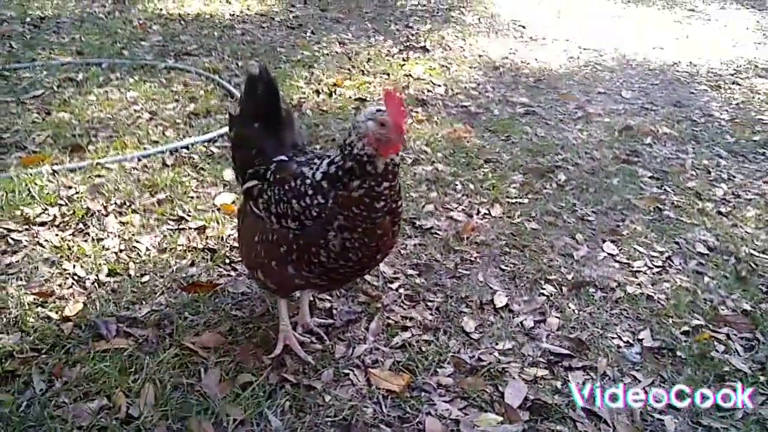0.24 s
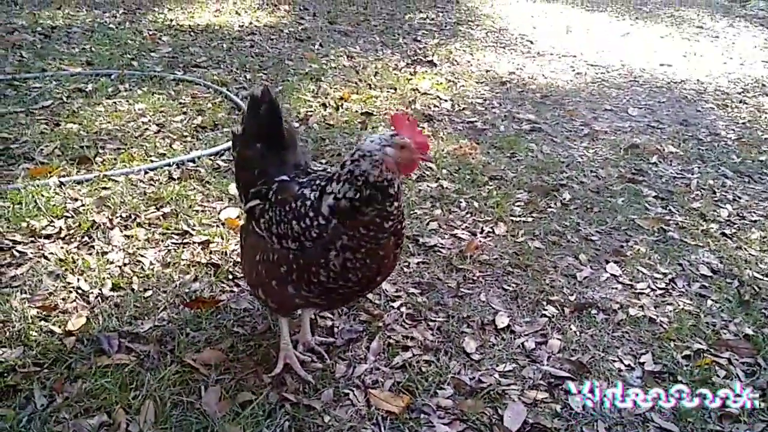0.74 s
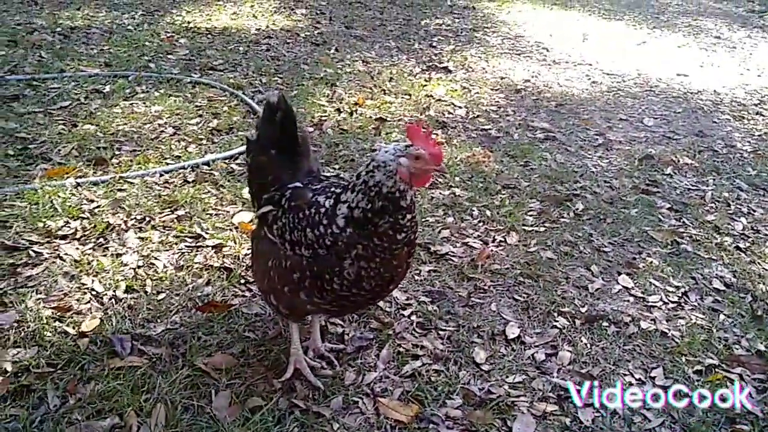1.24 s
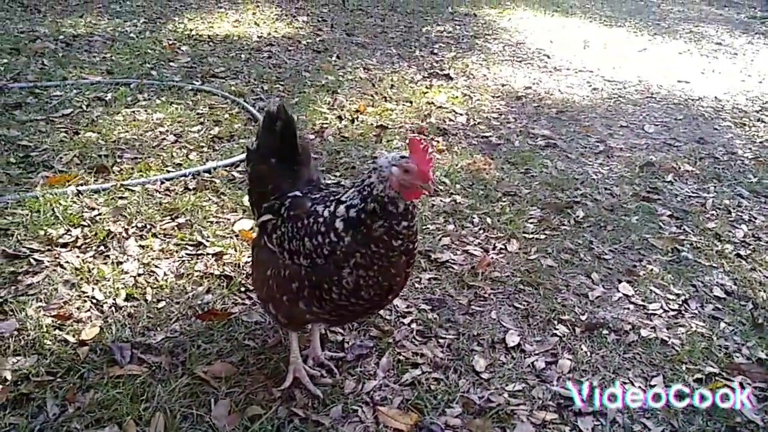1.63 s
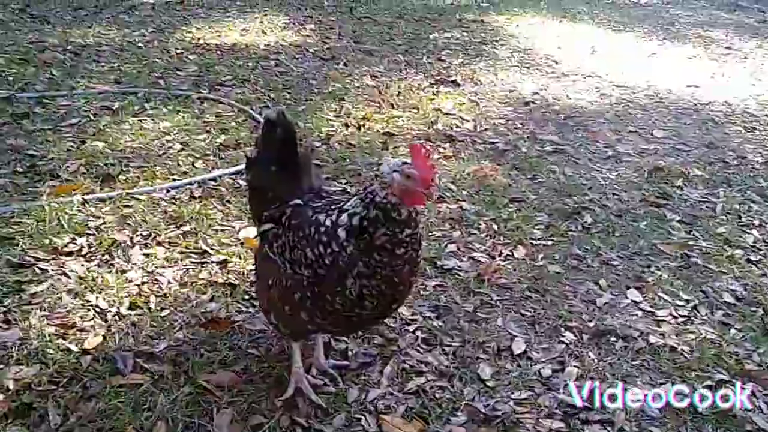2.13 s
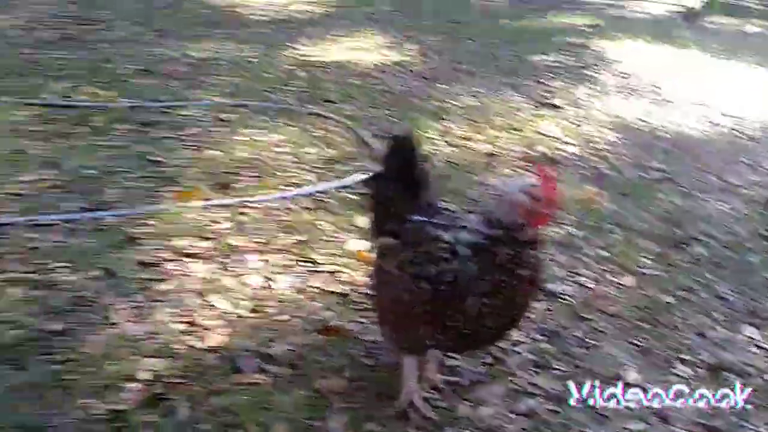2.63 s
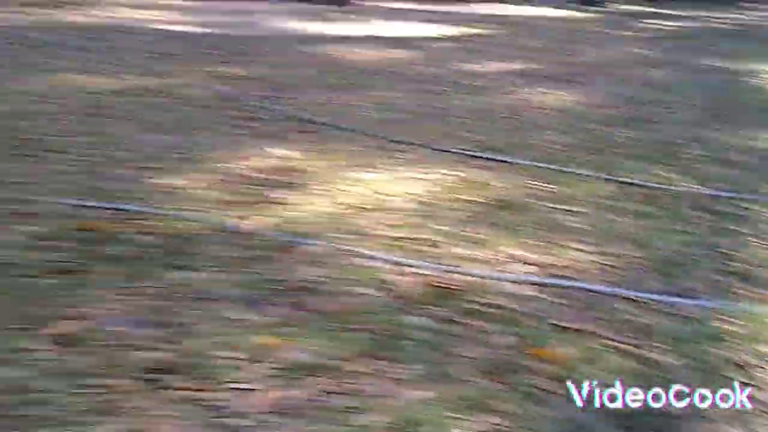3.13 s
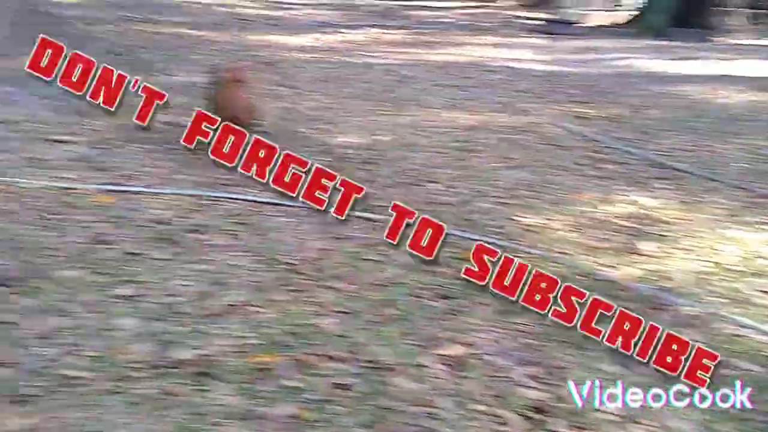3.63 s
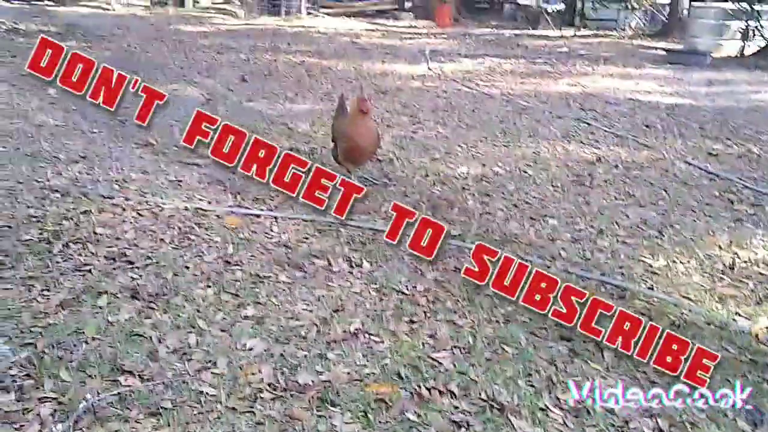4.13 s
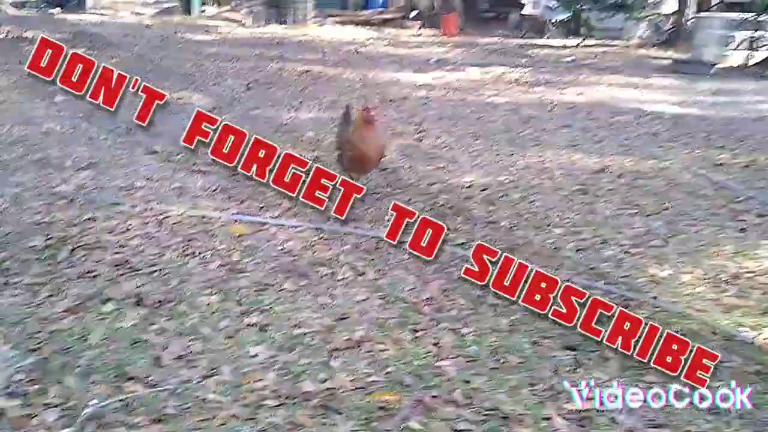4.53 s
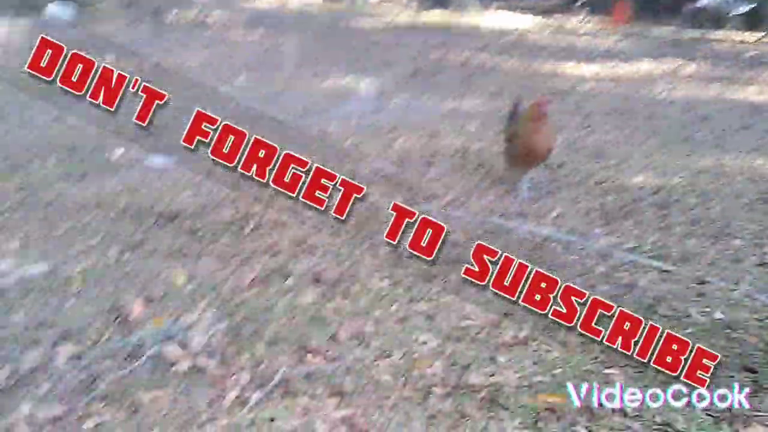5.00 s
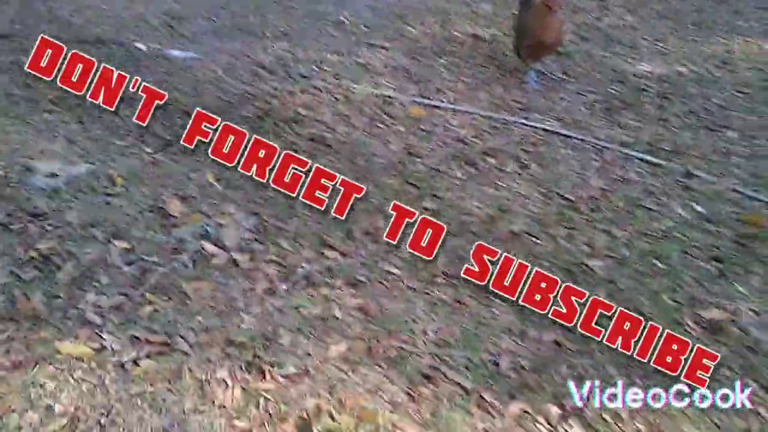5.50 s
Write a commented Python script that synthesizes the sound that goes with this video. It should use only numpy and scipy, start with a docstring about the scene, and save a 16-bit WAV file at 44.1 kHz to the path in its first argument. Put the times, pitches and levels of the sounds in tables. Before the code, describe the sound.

In a quiet leafy backyard, recorded in stereo on a handheld phone, the tail of a hen's call cracks and rings away. Light shuffles and lone ticks in dry litter follow, with a short peep near 1.4 seconds and barely audible bird notes. Then brittle footsteps come forward, brightest and densest around 4.3 seconds, leaning left, with a last cluster of snaps past 5 seconds. Soft air movement and low rumble lie underneath.

```python
"""A chicken's high, thin call, harmonics through a throat resonance, breaks hoarsely and rings off in a yard.
Hens shuffle through dry leaves, then the person holding the phone steps after them: crackling fractures
over hiss make the crunch, short bursts the snapping stems, damped modes the hand's knocks on the case.
A hen peeps; far fowl and songbirds are gliding sines. Filtered noise makes the gusts and the low outdoor
rumble, and unsteady sines make a distant motor hum."""
import sys
import numpy as np
from scipy import signal
from scipy.fft import rfft, irfft, next_fast_len
from scipy.io import wavfile
from scipy.ndimage import uniform_filter1d

SR = 44100
rng = np.random.default_rng(int(sys.argv[2]) if len(sys.argv) > 2 else 0)


def log_audio(samples):
    """Write samples as a 16-bit WAV file to the path given in sys.argv[1]."""
    # one column per channel
    frames = np.atleast_2d(samples).T
    # limit to full scale, then quantise
    limited = np.clip(frames, -1, 1)
    pcm = np.round(limited * 32767).astype(np.int16)
    wavfile.write(sys.argv[1], SR, pcm)


N = 254104
TIME = np.arange(N) / SR
TOP_HZ = 15800  # where the phone cuts the top; also the highest pitch of a leaf fracture

# the chicken's call, already under way at 0 s:
# [t/s, pitch/Hz, effort/dB, roughness/0-1, lift of the fundamental/dB]
CALL = [(-.3, 890, -28, .3, 0), (-.05, 885, -28, .1, 3), (0, 873, -30, .03, 1), (.027, 861, -25, 0, -3),
        (.055, 857, -27.5, 0, -1), (.08, 854, -25, 0, -3), (.125, 841, -32.5, 0, 6),
        (.168, 812, -31.5, .16, 1), (.186, 778, -39, .6, 2), (.214, 815, -43, .55, 8),
        (.236, 790, -51, .8, 16), (.256, 800, -48, .7, 8), (.29, 770, -61, .9, 10), (.34, 760, -98, .9, 6)]
# resonances of the chicken's throat: [f/Hz, level/dB]
THROAT = [(400, -30), (860, -25.7), (1300, -23), (1600, -9), (1730, 0), (2000, -22), (2200, -19),
          (2430, -14), (2520, -29), (2585, -30.5), (3000, -45), (3400, -39), (4300, -45), (5100, -52),
          (5700, -19), (6100, -41), (9000, -42), (13000, -38)]
# colour of the yard's echoes of the call: [f/Hz, level/dB]
ECHO_COLOUR = [(850, 5), (1700, 0), (2300, 3), (6000, -3)]

# feet pressing the leaves, first the hens', then the walker's:
# [t/s, time pressed/s, treble level before the swell/dB, body relative to treble/dB]
STEPS = [(0, .17, -79, -25), (.205, 0.049, -54, -7.5), (0.437, 0.016, -49.5, -15.5), (.56, 0.081, -60, -11),
         (.63, 0.087, -66.5, -2.5), (.752, .026, -58, -11), (.83, .06, -59.5, -14),
         (1.079, 0.022, -52, -19), (1.118, 0.083, -43, -13), (1.222, 0.065, -49.5, -13),
         (1.38, 0.098, -61, -4.5), (1.586, 0.063, -55, -11), (1.832, 0.12, -60, -11),
         (1.947, 0.062, -51.5, -13), (2.01, 0.063, -47, -17.5), (2.419, 0.092, -59.5, -13.5),
         (2.703, 0.067, -47.5, -12.5), (3.11, 0.027, -53.5, -10.5), (3.379, 0.12, -47.5, -11.5),
         (3.573, 0.024, -43, -13), (3.795, 0.049, -51.5, -19.5), (3.898, 0.053, -40, -22),
         (4.101, 0.0079, -37.5, -28), (4.27, 0.031, -33, -28), (4.326, 0.019, -35, -29),
         (4.425, 0.01, -32, -29.5), (4.465, 0.026, -41, -47), (4.565, 0.059, -41, -26.5),
         (4.635, 0.036, -38.5, -35), (4.853, 0.097, -43.5, -20), (5.217, 0.029, -38.5, -16),
         (5.269, 0.049, -43, -16), (5.486, 0.051, -46, -13.5), (5.564, 0.1, -51.5, -12)]
# litter stirring between the steps: [t/s, treble level/dB]
STIR = [(0, -52), (.5, -63.5), (1.0, -66.5), (1.5, -59.5), (1.78, -81.5), (2.3, -71.5), (2.7, -67.5),
        (3.1, -52), (3.6, -48), (3.85, -60), (4.2, -47), (4.8, -52.5), (5.15, -57.5), (5.75, -56)]
# where the feet are: [t/s, left minus right level/dB]
FEET_SIDE = [(0.2, -3), (2.4, -2.5), (3.55, -8.5), (3.85, -14.5), (4.3, -7), (5.05, -8), (5.25, -5.5),
             (5.75, -2.5)]
# mean lag of the crunch at the left port, first from the hens, then from the walker: [t/s, delay/s]
LEFT_LAG = [(2.8, .00025), (3.7, -.00034)]
# body and treble colour of crushed dry leaves: [f/Hz, level/dB]
LEAF_BODY = [(250, 1), (600, 1.5), (1000, 0), (1700, 3.5), (2700, -0.5), (4000, -2.5), (5500, -3.5),
             (7500, -21.5), (10000, -47.5)]
LEAF_CRISP = [(3000, -38), (6500, -13), (8000, -9.5), (9700, -3), (12300, 4.5), (14000, 1.5), (15700, 4.5)]
# centre of the band that stands out in the crunch, over time: [t/s, f/Hz]
CRUNCH_BAND = [(1.4, 3850), (3.4, 4850), (3.6, 2430), (5.27, 2690), (5.48, 4800)]
# single leaves and twigs snapping:
# [t/s, attack level/dB, body relative to the attack/dB, left minus right level/dB]
SNAPS = [(0.283, -49, -13, -1), (0.292, -50, -18, 5), (0.32, -46.5, -16, 6), (0.3348, -47, -22, 7),
         (0.344, -37, -15, -1), (0.6502, -50, -13, 9), (0.6872, -50, -10, 2), (0.889, -50, -23, 2),
         (0.894, -47, -18, 5), (0.9898, -57, -13, 0), (1.3096, -49, -16, -1), (1.4317, -47.5, -19, -3),
         (1.743, -47, -18, 3), (1.921, -44, -14, -4), (2.956, -40, -19, -6), (3.0713, -40, -9, -8),
         (3.0802, -48, -18, -12), (3.139, -48, -11, -3), (3.2864, -44.5, -12, -3), (3.3202, -49, -10, -7),
         (3.3884, -44, -17, 1), (3.3922, -35, -14, -13), (3.4185, -34.5, -18, -4), (3.4316, -42, -16, -1),
         (3.6363, -39, -28, -8), (3.9272, -37, -19, -14), (4.0115, -45, -25, -14), (4.0522, -36.5, -18, -9),
         (4.085, -43, -16, -5), (4.1122, -42, -14, -9), (4.3345, -35, -19, -8), (4.398, -36, -30, -9),
         (4.4375, -30.5, -10.5, -15), (5.229, -38.5, -11, 1), (5.252, -33.5, -14, 4),
         (5.2546, -38, -11, -6), (5.2675, -32.5, -13, -1), (5.2965, -39, -12, 4), (5.3124, -43, -15, 6),
         (5.3635, -36.5, -11, 2), (5.506, -42, -16, -1)]
# range of the ring of a snapping stem: [lowest f/Hz, highest f/Hz]
STEM_RANGE = (10500, 14500)
# how the two ports colour the litter differently: [f/Hz, left minus right level/dB]
PORTS = [(500, 0), (1500, -1), (2600, -5), (3700, 2), (6000, -1), (9500, -3), (12500, 3), (15500, 4.5)]

# the hand knocking the phone: [t/s, strength/dB, contact time/s]
KNOCKS = [(0.812, -66, 0.00012), (1.433, -52.5, 0.001), (3.419, -52.5, 0.00036), (3.465, -52, 0.00014),
          (3.898, -54.5, 0.0007), (5.732, -64.5, 0.000081)]
# ringing modes of the phone's case: [f/Hz, t60/s, level/dB]
CASE = [(203, 0.086, 8.5), (348, 0.025, 11), (565, 0.011, 12), (1100, 0.0046, 19), (1690, 0.012, 6)]
# small notes of hens and songbirds:
# [t/s, length/s, start f/Hz, end f/Hz, level/dB, flutter/share of pitch]
NOTES = [(1.394, 0.033, 1432, 1383, -43, 0.0023), (1.1, 0.65, 3290, 3260, -72, 0.037),
         (2.078, 0.03, 582, 570, -63.5, .01), (2.195, 0.039, 650, 620, -69, .01),
         (2.321, 0.04, 638, 620, -67.5, .01), (2.583, 0.26, 4950, 5580, -71, 0.018),
         (2.703, 0.23, 5900, 6260, -73, 0.016), (2.892, 0.29, 6170, 5630, -72.5, 0.02)]
# air pushing on the phone as it is swung: [t of the peak/s, swell/s, fade/s, level/dB]
GUSTS = [(.2, .2, 0.031, -55), (3.3, 0.63, 1, -59.5), (4.9, 0.52, 0.2, -56.5)]
# spectrum of the outdoor rumble: [f/Hz, relative level per Hz/dB]
YARD = [(25, -22.5), (42, -15), (62, -7), (95, -1.5), (135, -6), (200, -2.5), (300, -3.5), (450, -16),
        (900, -22.5), (1500, -24), (3000, -31.5), (7000, -36.5), (12500, -37.5), (16000, -45.5)]
# strength of the outdoor rumble, ahead of a fixed trim: [t/s, level/dB]
RUMBLE = [(0, -51.5), (.6, -58.5), (1.25, -57.5), (2.4, -62), (3.1, -57), (5.76, -56)]
# distant motor: [f/Hz, level/dB], both wavering around these values
HUM = [(60, -71), (90, -67), (180, -68)]

# spread of each harmonic's waver (not the second's), its flicker when rough, and the whole tone's shudder
WAVER_DB, FLICKER_DB, SHUDDER_DB = 3.2, 4, 3.5
TONE_LOSS = 0.19  # share of the tone lost when the voice is fully rough
# gains of the rasp and of the yard's near and far echoes
RASP_DB, NEAR_ECHO_DB, FAR_ECHO_DB = -8, -21, -27.5

# a step builds as the weight comes on, swells as it rolls over the foot, dies away as the leaves settle
STEP_ATTACK_S, STEP_SWELL_DB, STEP_RELEASE_DB_PER_S = 0.007, 3.5, 349
# body of the stirring when its treble is at 0 dB, and dB gained per dB of treble
STIR_BODY_DB, STIR_BODY_SLOPE = -40, 0.5
# the band that stands out, relative to the body of the crunch
CRUNCH_BAND_DB, CRUNCH_BAND_WIDTH_HZ = -6.5, 1400
CRACK_S, STEM_RING_S = .0004, .0006  # decay time constants of a snapping stem


def call():
    """A clean tone whose second harmonic sits on the throat resonance sags off it and breaks up hoarsely."""
    time = np.arange(CALL[0][0], CALL[-1][0], 1 / SR)
    size, early = len(time), np.sum(time < 0)
    hz, effort_db, rough, lift_db = curves(CALL, time)
    rough = np.clip(rough, 0, 1)

    # almost steady while clean; the pitch jitters and lurches once the voice breaks
    jitter = (.0008 + .05 * rough) * walk(500, size)
    lurch = (.0012 + .022 * rough) * walk(110, size)
    phase = 2 * np.pi * np.cumsum(hz * (1 + jitter + lurch)) / SR

    tone = np.zeros(size)
    for k in range(1, 19):
        harmonic = gain_at(k * hz, THROAT) * np.sin(k * phase + rng.uniform(0, 2 * np.pi))
        waver_db = WAVER_DB * (k != 2) * walk(55, size)
        flicker_db = FLICKER_DB * rough * walk(220, size)
        tone += harmonic * undb(lift_db * (k == 1) + waver_db + flicker_db)

    # alternate cycles differ, which puts lines between the harmonics, stronger as the voice roughens
    between = np.zeros(size)
    for k in np.arange(1, 8) - .5:
        line = gain_at(k * hz, THROAT) * np.sin(k * phase)
        between += line * undb(WAVER_DB * walk(55, size))
    tone = np.sqrt(2) * (tone + undb(-23 + 27 * rough) * between)

    # as the tone breaks, it shudders and a rasp pulses once a cycle through the same throat
    shudder = undb(SHUDDER_DB * rough * walk(116.2, size))
    pulsed_noise = rng.standard_normal(size) * (1 + np.cos(phase))
    rasp = rough * unit(colour(pulsed_noise, THROAT))
    voice = tone * shudder * (1 - TONE_LOSS * rough) + undb(RASP_DB) * rasp
    voice = np.pad(voice * undb(effort_db), (0, N - size))

    # the ground and near trees answer quickly, far fences faintly and long
    scattered = colour(voice, ECHO_COLOUR)
    near = echoes(scattered, t60=0.29, delay=0.04)
    far = echoes(scattered, t60=1.45, delay=0.093)
    # it reaches the left port three samples later and weaker
    direct = np.array([np.roll(voice, 3), voice]) * pan(-4)
    heard = direct + undb(NEAR_ECHO_DB) * near + undb(FAR_ECHO_DB) * far
    return np.pad(heard[:, early:], ((0, 0), (0, early)))


def echoes(x, t60, delay):
    """Scatter from trees, sheds and fences: a decaying noise tail, different at each port."""
    t = TIME[:SR]
    decay = np.exp(-np.log(1000) * t / t60)
    tail = rng.standard_normal((2, SR)) * decay * (t > delay)
    tail /= np.sqrt(np.sum(tail ** 2, axis=1, keepdims=True))
    return signal.fftconvolve(x[None], tail, axes=1)[:, :N]


def leaves():
    """Feet press the litter: dense fractures and thin lone ticks over the hiss of leaf sliding on leaf."""
    crisp_gain, body_gain = footfalls()
    side_db, = curves(FEET_SIDE)
    fractures = crackle(rate=3500, spread_db=3.2, ring_s=.0001)
    hiss = .45 * rng.standard_normal((2, N))
    stir = (fractures + hiss) * undb(1.7 * walk(180))
    stir = unit(recolour(stir, patchy_db=2.1, order=16))

    # lone ticks stand out of a light stirring but are lost in a heavy crunch
    ticks = crackle(rate=110, spread_db=2.3, ring_s=.00006)
    ticks = ticks / np.hypot(1, crisp_gain / undb(-44))
    crunch = stir + .45 * ticks
    crisp = unit(colour(crunch, LEAF_CRISP))
    body = unit(colour(crunch, LEAF_BODY))
    return (crisp * crisp_gain + body * body_gain + crunch_bands(stir)) * pan(side_db)


def footfalls():
    """Gains of the treble and body of the crunch: step and stirring powers add."""
    stir_db, = curves(STIR)
    stir_body_db = STIR_BODY_DB + STIR_BODY_SLOPE * stir_db
    power = undb(np.array([stir_db, stir_body_db])) ** 2
    for s, pressed, db, body_db in STEPS:
        press = pressure(pressed) * undb(db)
        add(power, s, np.array([press, press * undb(body_db)]) ** 2)
    return np.sqrt(power)


def pressure(pressed):
    """Gain of one step: it rises, swells while the foot presses and dies away."""
    t = TIME[:SR // 2]
    attack = np.sin(np.pi / 2 * np.minimum(t / STEP_ATTACK_S, 1)) ** 2
    arch = np.sin(np.pi * np.minimum(t / (pressed + 2 * STEP_ATTACK_S), 1) ** .8)
    swell_db = STEP_SWELL_DB * (arch - 2 / np.pi)
    release_db = STEP_RELEASE_DB_PER_S * np.maximum(t - pressed, 0)
    return attack * undb(swell_db - release_db)


def crackle(rate, spread_db, ring_s):
    """Tiny fractures of many sizes, each with its own pitch and its own delay between the ports."""
    count = int(rate * N / SR)
    when, pitch, size, place, lean = rng.random((count, 5)).T[:, :, None]
    size = undb(-spread_db * np.log(np.maximum(size, .02)))
    samples = np.arange(48)
    t = samples / SR
    grains = size * np.exp(-t / ring_s) * np.cos(2 * np.pi * pitch * TOP_HZ * t)

    right = (when * N).astype(int)
    lag_s, = curves(LEFT_LAG)
    lag = np.round(lag_s[right] * SR * (1 + 0.37 * (place - .5)))
    left = np.maximum(right + lag, 0).astype(int)
    ports = []
    for start, share in ((left, .5 + lean), (right, 1.5 - lean)):
        ports.append(np.bincount((start + samples).ravel(), (grains * share).ravel(), N)[:N])
    return unit(np.array(ports))


def recolour(x, patchy_db, order):
    """The crunch's colour keeps shifting: overlapping bands waver separately in level."""
    size = next_fast_len(N)
    spectrum = rfft(x, size)
    place = np.minimum(np.arange(size // 2 + 1) * SR / size / TOP_HZ, 1) * order
    out = 0
    for k in range(order + 1):
        band = irfft(spectrum * np.maximum(1 - abs(place - k), 0), size)[:, :N]
        out = out + band * undb(patchy_db * walk(22))
    return out


def crunch_bands(stir):
    """A band of the crunch stands out at each step, filtered from the fractures and hiss."""
    out = np.zeros((2, N))
    for s, pressed, db, body_db in STEPS:
        hz = np.interp(s, *np.transpose(CRUNCH_BAND))
        press = pressure(pressed) * undb(db + body_db + CRUNCH_BAND_DB)
        drive = np.take(stir, int(s * SR) + np.arange(len(press)), axis=1, mode="wrap")
        b, a = signal.iirpeak(hz, hz / CRUNCH_BAND_WIDTH_HZ, fs=SR)
        add(out, s, unit(signal.lfilter(b, a, drive)) * press)
    return out


def snaps():
    """A brittle stem breaks: a brief high ring, a crack and a shiver of the leaf around it."""
    out, t = np.zeros((2, N)), TIME[:SR // 30]

    def strike(x, lo_hz, hi_hz):
        """One band of a snap, at rms 1 over its attack."""
        x = signal.sosfilt(signal.butter(2, [lo_hz, hi_hz], "band", fs=SR, output="sos"), x)
        return x / np.sqrt(np.mean(x[t < .0032] ** 2))

    for s, db, body_db, side_db in SNAPS:
        ring = np.sin(2 * np.pi * rng.uniform(*STEM_RANGE) * t) * np.exp(-t / STEM_RING_S)
        decay = np.exp(-t / CRACK_S) + .07 * np.exp(-t / .005)  # crack, then shiver
        crack = rng.choice([-1., 1.], len(t)) * decay
        attack = strike(.5 * ring + crack, 10000, 15500)
        body = undb(body_db) * strike(crack, 2500, 6000)
        left, right = (attack + body) * undb(db) * pan(side_db)
        add(out[0], s + np.interp(s, *np.transpose(LEFT_LAG)), left)
        add(out[1], s, right)
    return out


def knocks():
    """Soft pushes of the fingers ring the case's modes; a longer contact sounds duller."""
    out, t = np.zeros(N), TIME[:SR // 10]
    case = np.zeros(len(t))
    for hz, t60, db in CASE:
        case += undb(db) * np.sin(2 * np.pi * hz * t) * np.exp(-np.log(1000) * t / t60)
    for s, db, contact in KNOCKS:
        push = t * np.exp(-4 * t / contact)
        add(out, s, undb(db) * signal.fftconvolve(case, push / push.sum()))
    return out


def birds():
    """Hens and songbirds: short gliding sines with a fast pitch flutter and the yard's soft echo."""
    out, flutter = np.zeros(N), walk(500)
    for s, length, start_hz, end_hz, db, depth in NOTES:
        u = np.linspace(0, 1, int(length * SR))
        glide = start_hz + (end_hz - start_hz) * u
        hz = glide * (1 + depth * flutter[:len(u)])
        add(out, s, undb(db) * np.sin(np.pi * u) * np.sin(2 * np.pi * np.cumsum(hz) / SR))
    return out + undb(-8.5) * echoes(out, t60=0.4, delay=0.004)


def buffet():
    """Air pushes on the phone as it is swung and carried: soft gusts of low noise."""
    push = np.zeros(N)
    for s, swell, fade, db in GUSTS:
        push += undb(db) * np.exp(-((TIME - s) / np.where(TIME < s, swell, fade)) ** 2)
    low = colour(rng.standard_normal(N), [(25, -40.5), (55, 6), (100, 9), (170, -13), (600, -26.5)])
    return unit(low) * push


def yard():
    """Distant rumble, much alike at both ports in the bass, and a motor hum wavering in pitch and level."""
    db, = curves(RUMBLE)
    mid, side = colour(rng.standard_normal((2, N)), YARD)
    side = colour(side, [(60, -10.5), (250, -12.0), (700, 2.0), (2000, 1.0)])
    air = (mid + side * np.array([[1], [-1]])) / np.std(mid) * undb(db - 2.0)
    for hz, line_db in HUM:
        phase = 2 * np.pi * np.cumsum(hz * (1 + .02 * walk(14))) / SR
        air = air + np.sqrt(2) * undb(line_db + 2.2 * walk(13)) * np.sin(phase)
    return air


def undb(db):
    """Decibels to gain."""
    return 10 ** (np.asarray(db) / 20)


def unit(x):
    """Scale to rms 1."""
    return x / np.sqrt(np.mean(x ** 2))


def curves(table, time=TIME):
    """The columns of a timed table, sample by sample."""
    s, *columns = np.transpose(table)
    return [np.interp(time, s, c) for c in columns]


def gain_at(hz, spectrum):
    """Gain of an [f/Hz, level/dB] spectrum at any frequency, interpolated over log frequency."""
    f, db = np.transpose(spectrum)
    return undb(np.interp(np.log(np.maximum(hz, 1)), np.log(f), db))


def colour(x, spectrum, power=1):
    """Filter by an [f/Hz, level/dB] spectrum, its gain raised to a power."""
    length = x.shape[-1]
    size = next_fast_len(length + SR // 10, real=True)
    gain = gain_at(np.arange(size // 2 + 1) * SR / size, spectrum) ** power
    return irfft(rfft(x, size) * gain, size)[..., :length]


def walk(rate, size=N):
    """Smooth random drift of rms 1 that changes about rate times a second."""
    k = max(int(SR / rate), 1)
    held = np.repeat(rng.standard_normal(size // k + 1), k)
    return unit(uniform_filter1d(held, k)[:size])


def pan(db):
    """Left and right gains for a level difference, at constant power."""
    g = undb(np.array([[.5], [-.5]]) * db)
    return g / np.sqrt(np.mean(g ** 2, axis=0))


def add(track, s, sound):
    """Mix a sound in at time s."""
    i = int(s * SR)
    track[..., i:i + sound.shape[-1]] += sound[..., :N - i]


def scene():
    """Everything as it reaches the phone's two ports, which colour the litter differently."""
    left, right = leaves() + snaps()
    litter = np.array([colour(left, PORTS, power=1 / 2), colour(right, PORTS, power=-1 / 2)])
    return call() + litter + knocks() + birds() + buffet() + yard()


def record(dry):
    """The phone drops the deepest bass and cuts the top steeply."""
    thin = signal.sosfilt(signal.butter(3, 40, "high", fs=SR, output="sos"), dry)
    return signal.sosfilt(signal.ellip(10, .2, 70, TOP_HZ, fs=SR, output="sos"), thin)


dry = scene()
out = record(dry)
log_audio(out)
```